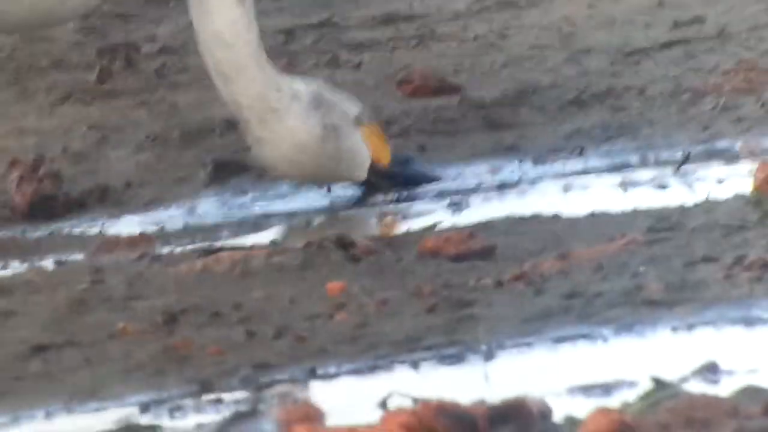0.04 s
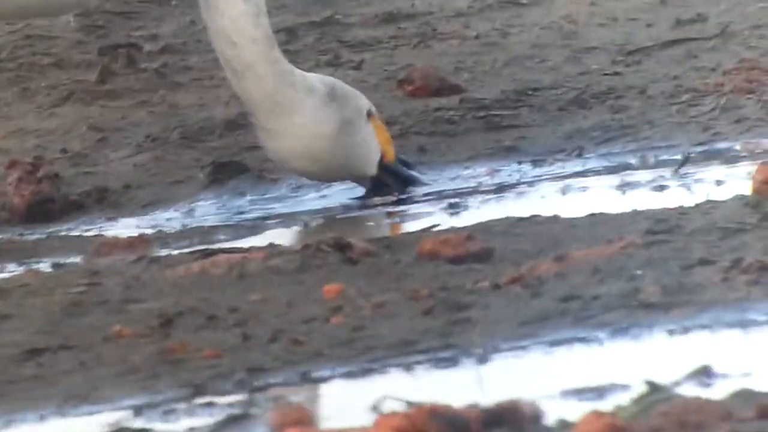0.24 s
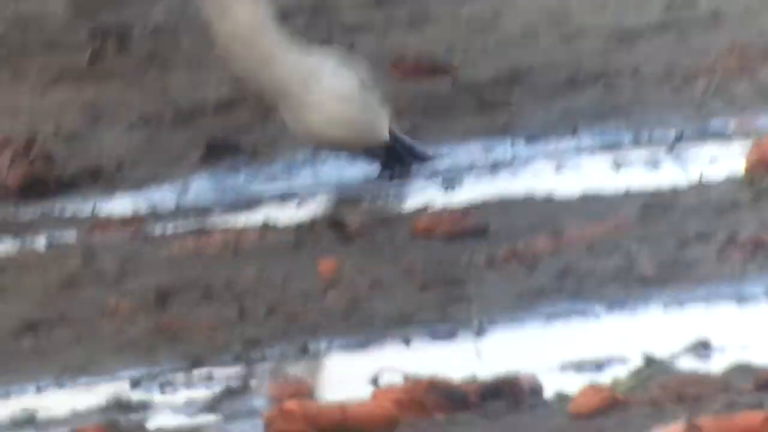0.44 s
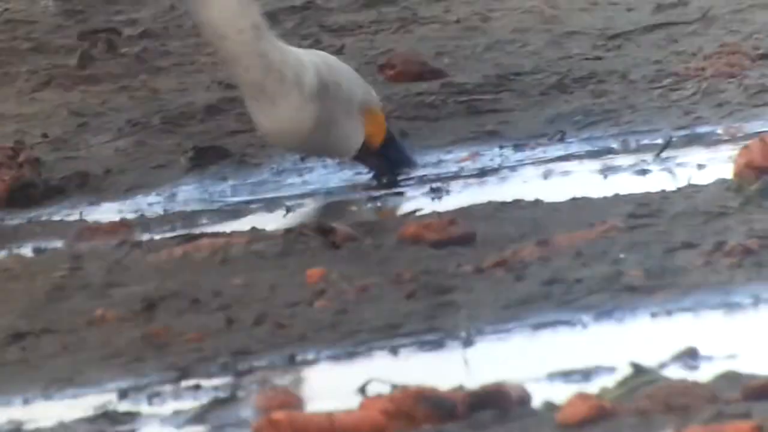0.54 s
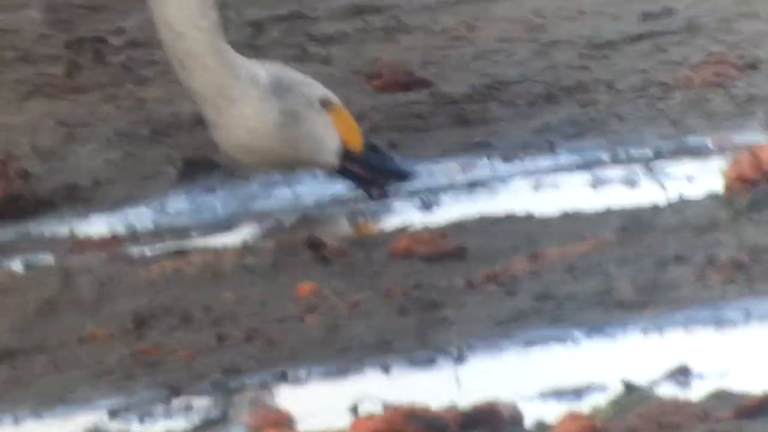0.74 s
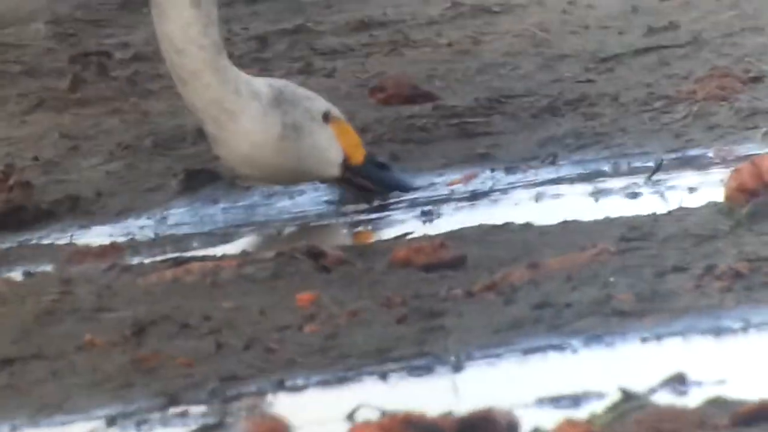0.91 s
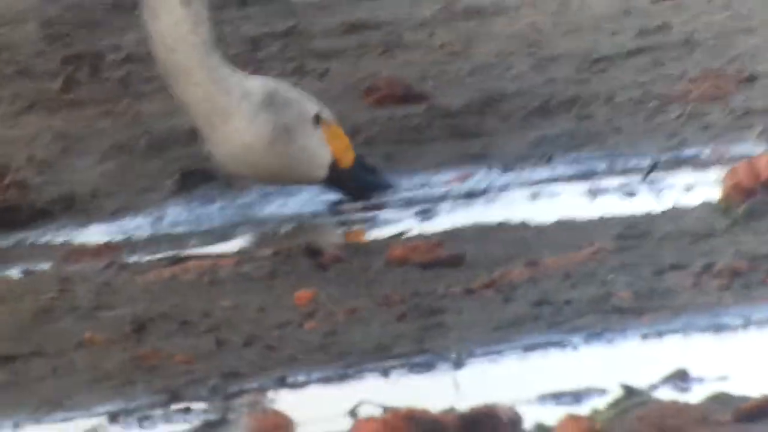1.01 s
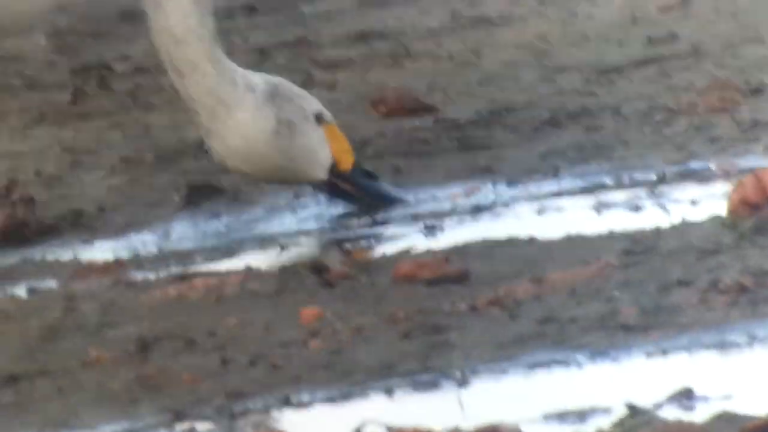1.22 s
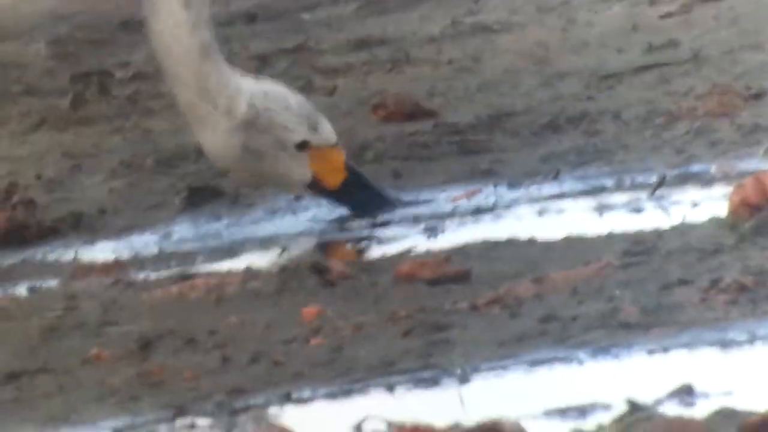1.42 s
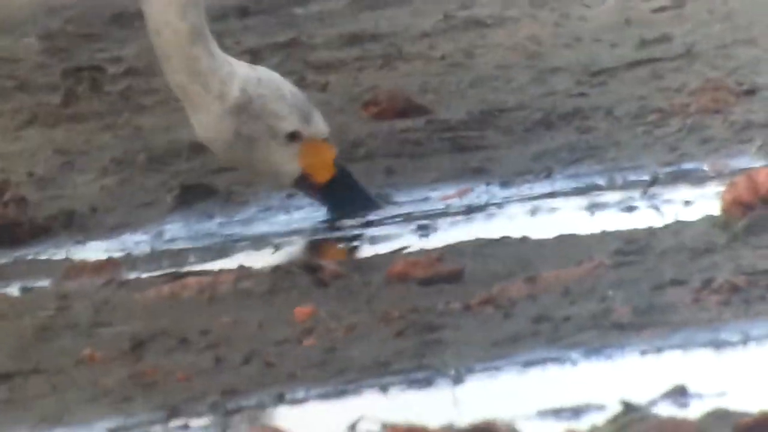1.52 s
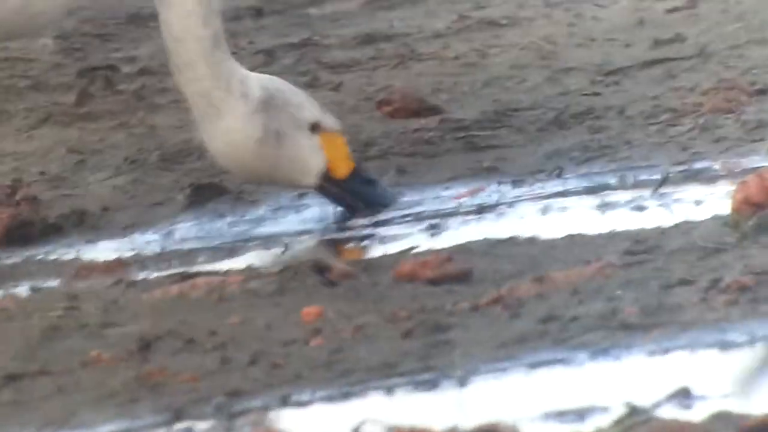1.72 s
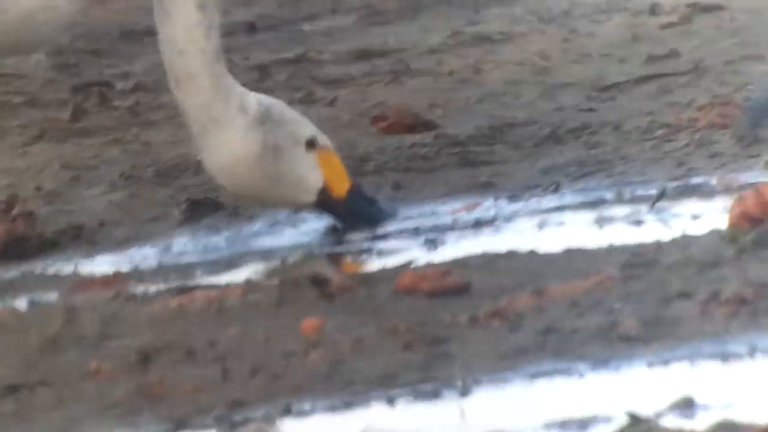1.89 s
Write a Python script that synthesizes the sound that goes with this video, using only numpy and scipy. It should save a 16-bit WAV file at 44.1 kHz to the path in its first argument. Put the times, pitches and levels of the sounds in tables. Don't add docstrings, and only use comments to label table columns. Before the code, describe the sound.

Swan honks, nasal and brassy, some metres off outdoors. The first wavers in joined notes at 0.2-0.5 s; a breathier two-note honk comes at 0.7-0.92; a very short falling one at 1.01-1.08 with a thin squeak. Low wind thumps hit the right side around 0.93-1.0. A lower, sagging call sounds at 1.61-1.75. Steady distant wind and road roar with faint hiss throughout, almost no echo.

```python
import sys
import numpy as np
from scipy import signal
from scipy.fft import rfft, irfft
from scipy.io import wavfile

SR = 44100
rng = np.random.default_rng(int(sys.argv[2]) if len(sys.argv) > 2 else 0)


def voltage_ratio(decibels):
    exponent = np.asarray(decibels, float) / 20
    return 10 ** exponent


def store_wav(level_fs):
    pcm = np.round(np.clip(np.atleast_2d(level_fs), -1, 1) * 32767)
    wavfile.write(sys.argv[1], SR, pcm.T.astype(np.int16))


N = 85995


def column(rows_db):
    return voltage_ratio(np.array(rows_db)[:, None])


def band_noise(order, low_hz, high_hz, source):
    band = signal.butter(order, [low_hz, high_hz], "band", fs=SR, output="sos")
    noise = signal.sosfilt(band, source)
    return noise / noise.std()


def drift(rate_hz):
    pole = np.exp(-80 * np.pi * rate_hz / SR)
    steps = rng.standard_normal(N // 40 + 2002)
    slow = signal.lfilter([1], [1, -2 * pole, pole * pole], steps)[2000:]
    return np.interp(np.arange(N) / 40, np.arange(len(slow)), slow / slow.std())


def at_hz(rows, hz):
    row_hz, *columns = np.transpose(rows)
    return [np.interp(np.log(hz + 1), np.log(row_hz), values) for values in columns]


VOICE_DB, EDGE_S = 6.5, 0.0023
WAVER, WAVER_HZ = 0.00099, 40.3
SHIMMER_DB, SHIMMER_HZ = 0.3165, 35
EDGE_REACH_DB = 23
MID_TIRE = 0.3
RASP_HZ, RASP_WIDTH_HZ = 3305, 600


def honk(notes, pipe, arrival, rasp_db, fade_db=0, third=None):
    t = np.arange(N) / SR
    s, *columns = np.vstack(notes).T
    hz, first_db, over_db, edge_db = [np.interp(t, s, values) for values in columns]
    phase = 2 * np.pi * np.cumsum(hz * (1 + WAVER * drift(WAVER_HZ))) / SR
    phase -= phase[int(s[0] * SR)]
    tiring_db = fade_db * np.clip(t - s[0], 0, 1)

    out = np.zeros((2, N))
    for partial, pipe_db in enumerate([0, 0] + pipe, start=1):
        if partial == 1:
            drive_db = first_db
        elif partial == 3 and third:
            drive_db = np.interp(t, *np.transpose(third))
        elif partial <= 3:
            drive_db = over_db
        elif partial <= 7:
            drive_db = edge_db
        else:
            drive_db = np.minimum(over_db, edge_db + EDGE_REACH_DB) - tiring_db
        if partial in (6, 7):
            drive_db = drive_db - MID_TIRE * tiring_db
        shimmer_db = SHIMMER_DB * min(partial, 6) * drift(SHIMMER_HZ)
        level = voltage_ratio(VOICE_DB + pipe_db + drive_db + shimmer_db)
        pan_db, lead = arrival[min(partial, len(arrival)) - 1]
        wave = partial * phase + (partial - 1) ** 2 * np.pi / 2
        out += level * [np.sin(wave), voltage_ratio(-pan_db) * np.sin(wave - lead)]

    puffs = rng.standard_normal(N) * (1 + np.sin(phase))
    breath = band_noise(2, RASP_HZ - RASP_WIDTH_HZ / 2, RASP_HZ + RASP_WIDTH_HZ / 2, puffs)
    out += voltage_ratio(edge_db + rasp_db) * breath * column([0, -5])
    return out * np.clip(np.minimum(t - s[0], s[-1] - t) / EDGE_S + 1, 0, 1)


# time in seconds, pitch in Hz, fundamental, overtone and edge in dB.
FIRST_HONK = [
    [(.2, 607, -50, -58, -85), (.21, 615, -44, -45, -77), (.224, 637.6, -39, -41, -64),
     (.242, 650, -35, -37.5, -64), (.252, 658.6, -34.5, -36.5, -54.5), (.272, 658, -35, -36, -48.5),
     (.286, 649, -35.5, -43.5, -66), (.292, 681, -44, -44, -74)],
    [(.302, 694, -33.5, -54, -73), (.31, 651, -34.5, -42, -55), (.322, 646, -35.5, -39.5, -52.5),
     (.36, 647.3, -35.5, -40, -55.5), (.382, 654.7, -36, -36.5, -55), (.42, 665, -34, -37, -50.5),
     (.436, 656, -34.5, -39, -50.5), (.45, 646, -44, -52, -78)],
    [(.458, 676.5, -34, -53, -75), (.468, 644, -47, -51, -66), (.477, 625, -36, -44, -53),
     (.486, 617, -41, -50, -70), (.498, 617, -56, -70, -82)],
]
SECOND_HONK = [
    [(.7065, 622, -41, -47, -80), (.7085, 626, -38.5, -45, -77), (.728, 629, -30, -39, -80),
     (.754, 656, -32, -60, -84), (.772, 649, -37, -56, -80)],
    [(.788, 650, -34.5, -45, -70), (.8, 643, -28.5, -37, -57), (.818, 650, -27.5, -33, -63),
     (.842, 650, -27.5, -34, -56), (.878, 637, -28, -39.5, -67), (.897, 618.4, -32, -45, -60),
     (.91, 619, -38, -60, -68), (.92, 601.5, -55, -70, -78)],
]
THIRD_HONK = [
    [(1.007, 635, -62, -66, -80), (1.0125, 635, -56, -62, -75), (1.0145, 632, -38.5, -56, -70),
     (1.026, 627, -32.5, -42, -60), (1.04, 622, -32, -43, -50), (1.06, 612, -35, -48, -51),
     (1.07, 585, -46, -52, -68), (1.078, 575, -58, -60, -78)],
]
LOW_CALL = [
    [(1.612, 495, -43, -62, -75), (1.622, 501, -46, -41, -68), (1.636, 496.3, -40, -32, -48.5),
     (1.655, 507, -40, -28.5, -48), (1.696, 501.3, -41, -28, -47.5), (1.714, 493.4, -39, -31, -49),
     (1.726, 485, -44, -32, -75), (1.74, 472, -45, -35, -76), (1.752, 452, -57, -46, -85)],
]
SQUEAK_CALL = [
    [(1.007, 744, -62, -70, -90), (1.0125, 744, -56, -66, -90), (1.0145, 744, -38, -62, -90),
     (1.03, 738, -37.5, -56, -90), (1.042, 715, -51, -65, -90), (1.055, 730, -58, -75, -90)],
]
# time in seconds, level in dB.
SECOND_HONK_THIRD = [(.71, -61), (.73, -52), (.75, -67), (.79, -69), (.81, -54), (.86, -62), (.885, -51),
                     (.91, -52)]
LOW_CALL_THIRD = [(1.62, -54), (1.64, -42), (1.665, -39.5), (1.7, -37.5), (1.715, -41), (1.728, -47),
                  (1.74, -64)]
FIRST_PIPE = [-21.5, -18, 1.0, -3, -1.5, -18, -27, -29.5, -31]
SECOND_PIPE = [0, -12, 7, -3, -18, -41, -44, -33, -42]
THIRD_PIPE = [-13, -13, 2, -19, -20, -26]
LOW_PIPE = [0, -9, -24, -14, -4.5, -41, -42, -54, -54, -45, -48, -44]
# left over right in dB, left lead in radians.
HIGH_ARRIVAL = [(3, 0.14), (3.5, 0.13), (7, -1.5), (-13.5, 2.5), (8.5, 0.56), (0.5, 0.9), (-2, 1.85),
                (3, 1.5)]
LOW_ARRIVAL = [(3, 0.12), (5.5, -0.69), (4, -1.1), (-3, -0.54), (-16, 1.1), (1, .9), (-1, -0.39), (-2, 1.1)]


def swans():
    return (honk(FIRST_HONK, FIRST_PIPE, HIGH_ARRIVAL, rasp_db=-17, fade_db=70)
            + honk(SECOND_HONK, SECOND_PIPE, HIGH_ARRIVAL, rasp_db=1.0, third=SECOND_HONK_THIRD)
            + honk(THIRD_HONK, THIRD_PIPE, HIGH_ARRIVAL, rasp_db=-4)
            + honk(LOW_CALL, LOW_PIPE, LOW_ARRIVAL, rasp_db=-15, fade_db=30, third=LOW_CALL_THIRD)
            + honk(SQUEAK_CALL, [], HIGH_ARRIVAL, rasp_db=0))


# centre in seconds,
# half length in seconds, pitch in Hz, glide in Hz per second, level in dB.
STRAY_WHISTLES = [(.808, .016, 3740, 1500, -52), (.822, .008, 3570, 0, -49), (.853, .016, 4530, -1500, -54),
                  (.87, .014, 6400, -3000, -66), (.902, .005, 3700, 0, -51), (.903, .004, 3350, 0, -51),
                  (1.028, .008, 3340, -6000, -50), (1.043, .01, 3230, -6000, -49),
                  (1.047, .01, 3450, -3000, -56), (1.042, .016, 3720, -2000, -54),
                  (.232, .013, 5130, 8000, -61)]
GRAIN_DB, GRAIN_HZ = 3, 90


def strays():
    t = np.arange(N) / SR
    out = np.zeros(N)
    for s, half_s, hz, glide, db in STRAY_WHISTLES:
        age = t - s
        swell = voltage_ratio(db + GRAIN_DB * drift(GRAIN_HZ)) * np.exp(-(age / half_s) ** 2)
        out += swell * np.sin(2 * np.pi * (hz + glide * age / 2) * age)
    return out * column([3, -4])


# time in seconds, peak in dB, pitch in Hz, port (0 left, 1 right).
WIND_THUMPS = [
    (0.9342, -28, 213, 1),
    (0.945, -21.5, 225, 1),
    (0.95, -25, 200, 1),
    (0.9595, -17, 241, 1),
    (.9740, -25, 146, 1),
    (.9790, -24.5, 233, 1),
    (0.517, -27, 174, 0),
]
THUMP_CYCLES, PORT_CUT_HZ = 0.63, 55
PUFF_S, PUFF_HALF_S, PUFF_DB = 1, 0.021, -42


def gust():
    t = np.arange(N) / SR
    out = np.zeros((2, N))
    for s, db, hz, port in WIND_THUMPS:
        cycles = (t - s) * hz
        out[int(round(port))] -= voltage_ratio(db) * np.cos(2 * np.pi * cycles) * np.exp(-(cycles / THUMP_CYCLES) ** 2)
    rumble = band_noise(2, 70, 328, rng.standard_normal(N))
    out[1] += voltage_ratio(PUFF_DB) * rumble * np.exp(-((t - PUFF_S) / PUFF_HALF_S) ** 2)
    return signal.sosfilt(signal.butter(2, PORT_CUT_HZ, "high", fs=SR, output="sos"), out)


BREEZE_DB, LUMP_DB, LUMP_HZ = -62.5, 5.5, 7


def breeze():
    low = band_noise(3, 62, 145, rng.standard_normal(N))
    return voltage_ratio(BREEZE_DB + LUMP_DB * drift(LUMP_HZ)) * low * [[0], [1]]


# frequency in Hz, left and right in dB per Hz.
FAR_ROAR = [(28.7, -103, -101), (110.5, -72.5, -75), (326, -68.5, -69.5), (580, -72.5, -75.5),
            (1058, -64.5, -68.5), (1263, -71, -72),
            (1960, -72.5, -76), (2620, -83, -84), (3600, -85.5, -89), (4710, -95, -96), (6300, -108, -110)]
# frequency in Hz, likeness from 0 to 1, left lead in radians.
ROAR_LIKENESS = [(50, 1, 0), (200, 1, 0.66), (650, 0.87, -0.91), (1280, 0.63, -2.5), (1855, 0.82, -3.0),
                 (2365, 0.7, -6), (3120, 0.62, -5), (5200, 0, -6)]
GAIN_HZ, GAIN_WIDTH_HZ, GAIN_DB = 2350, 135, 4.5
DRONE_HZ, DRONE_WIDTH_HZ, DRONE_DB = 172.7, 11, 5.5
SWELL_DB, SWELL_HZ = -1.08, 0.99


def roar():
    hz = np.arange(N // 2 + 1) * SR / N
    left_db, right_db = at_hz(FAR_ROAR, hz)
    right_db = right_db + GAIN_DB * np.exp(-((hz - GAIN_HZ) / GAIN_WIDTH_HZ) ** 2)
    drone_db = DRONE_DB * np.exp(-((hz - DRONE_HZ) / DRONE_WIDTH_HZ) ** 2)
    alike, lead = at_hz(ROAR_LIKENESS, hz)
    alike = np.clip(alike, 0, 1)
    shared, own = rfft(rng.standard_normal((2, N))) * np.sqrt(SR / 2) * voltage_ratio(drone_db)
    left = voltage_ratio(left_db) * shared
    right = voltage_ratio(right_db) * np.exp(-1j * lead) * (alike * shared + np.sqrt(1 - alike ** 2) * own)
    pair = np.array([left, right])

    octave = np.log2(np.clip(hz, 30, 30 * 512) / 30)
    share = sum(np.clip(1 - abs(octave - k), 0, 1) for k in range(10))
    return irfft(pair * share, N) * voltage_ratio(SWELL_DB * drift(SWELL_HZ))


# frequency in Hz, level in dB per Hz.
PREAMP_HISS = [(3000, -112), (5800, -109), (6800, -104), (7800, -100.5), (10000, -99.3), (14000, -98.5)]


def hiss():
    hz = np.arange(N // 2 + 1) * SR / N
    spectrum = rfft(rng.standard_normal((2, N))) * np.sqrt(SR / 2)
    return irfft(spectrum * voltage_ratio(at_hz(PREAMP_HISS, hz)[0]), N)


ECHO_S, ECHO_DB = 0.019, -43


def scene():
    birds = swans() + strays()
    echo = voltage_ratio(ECHO_DB) * np.roll(birds, int(ECHO_S * SR), axis=1)
    return birds + echo + gust() + breeze() + roar() + hiss()


def roll_off(x):
    return signal.sosfilt(signal.butter(12, 14540, fs=SR, output="sos"), x)


def record(dry):
    low_pass = signal.ellip(12, 0.5, 60, 14520, fs=SR, output="sos")
    mix = signal.sosfilt(low_pass, dry)
    return roll_off(mix)


dry = scene()
out = record(dry)
store_wav(out)
```